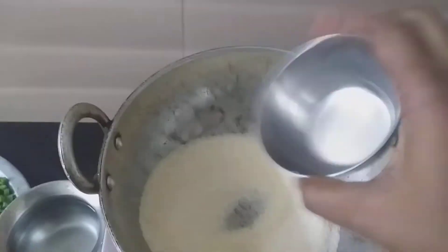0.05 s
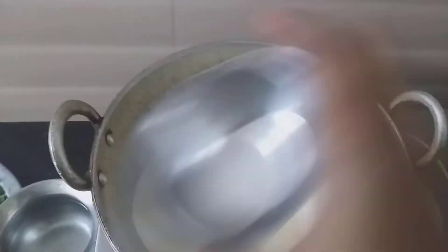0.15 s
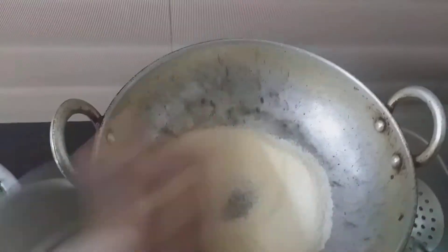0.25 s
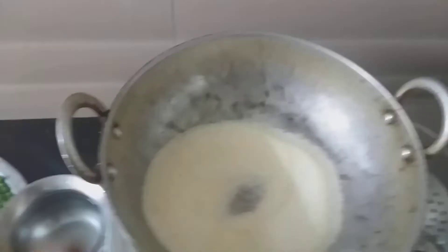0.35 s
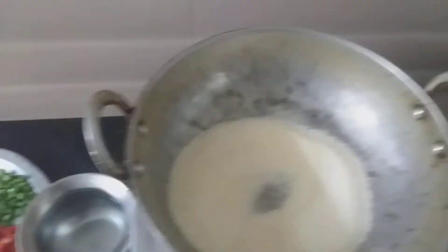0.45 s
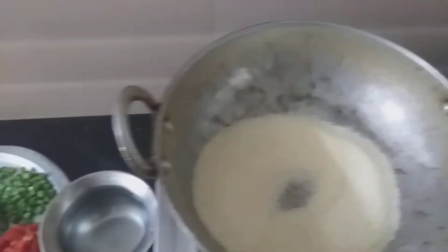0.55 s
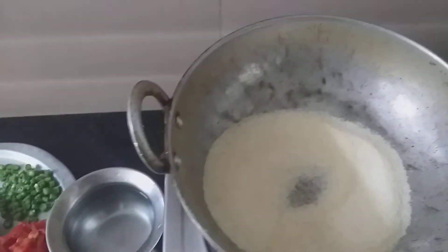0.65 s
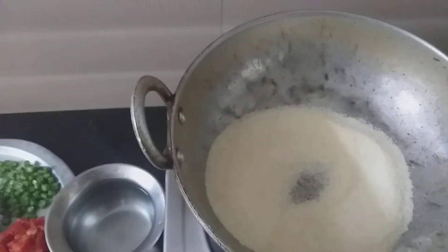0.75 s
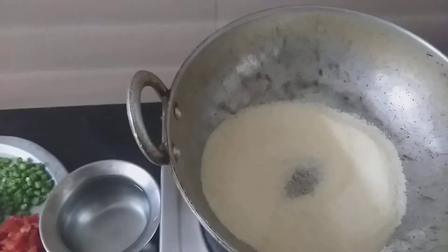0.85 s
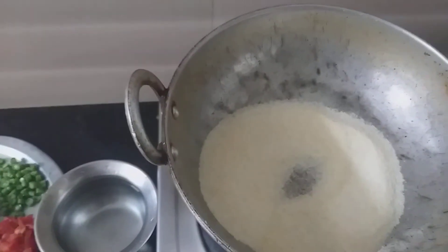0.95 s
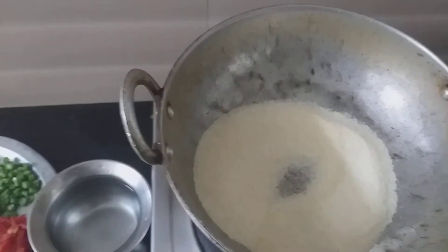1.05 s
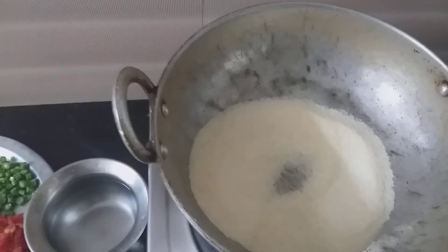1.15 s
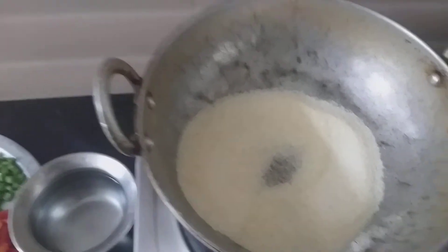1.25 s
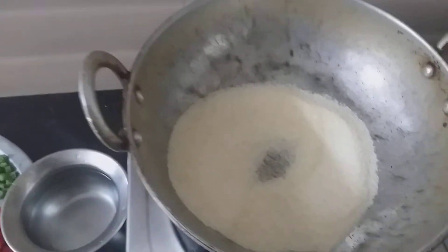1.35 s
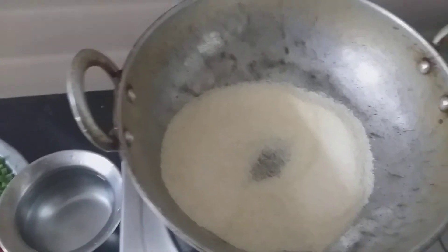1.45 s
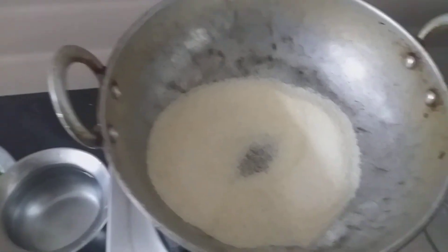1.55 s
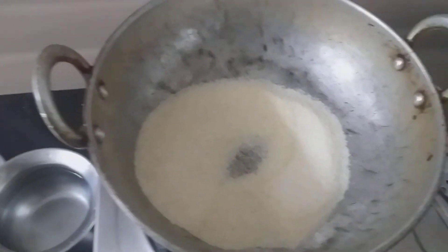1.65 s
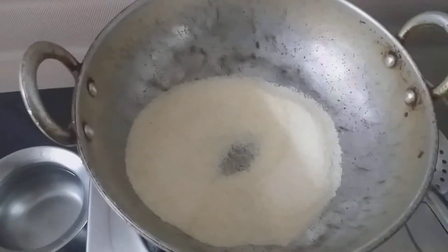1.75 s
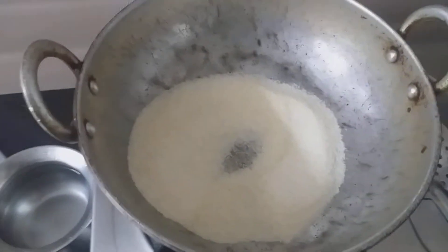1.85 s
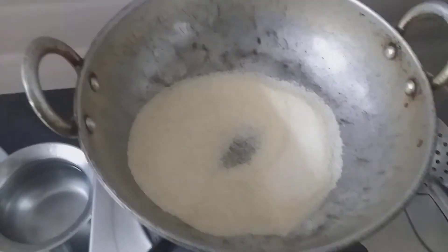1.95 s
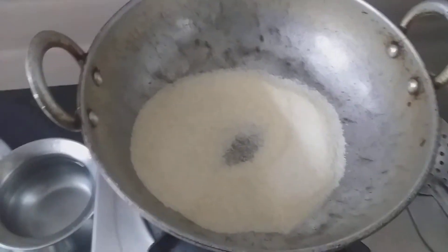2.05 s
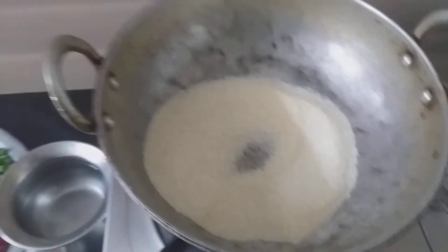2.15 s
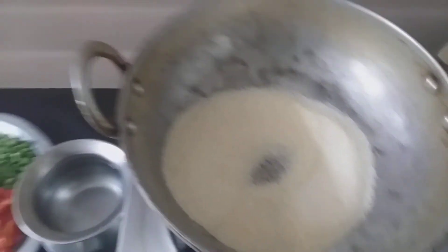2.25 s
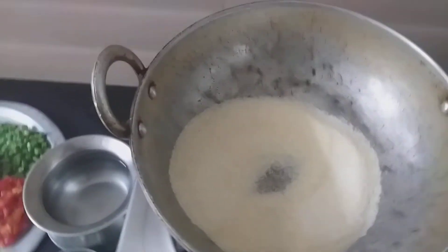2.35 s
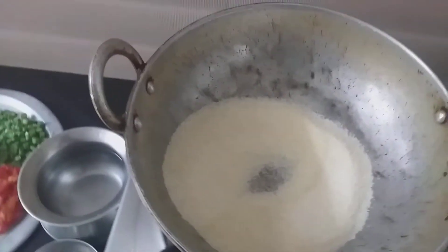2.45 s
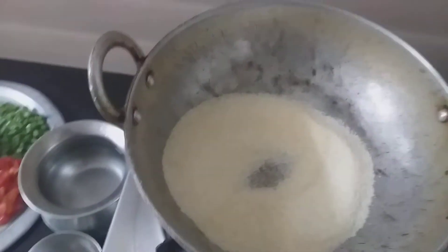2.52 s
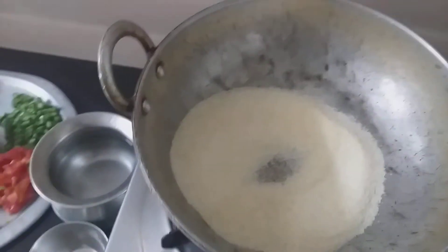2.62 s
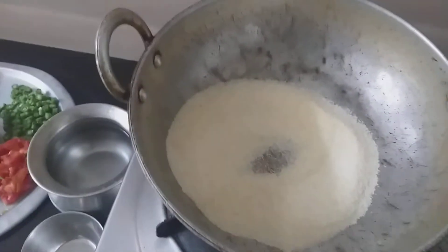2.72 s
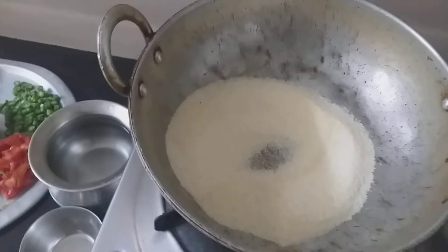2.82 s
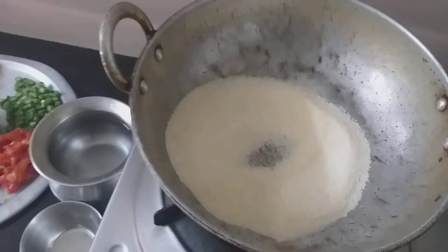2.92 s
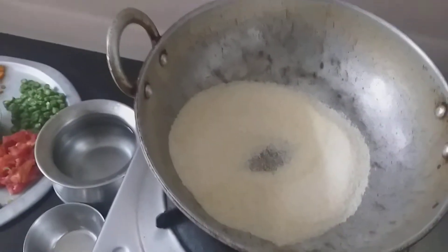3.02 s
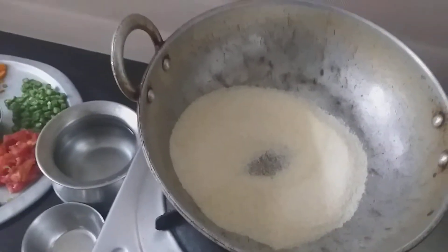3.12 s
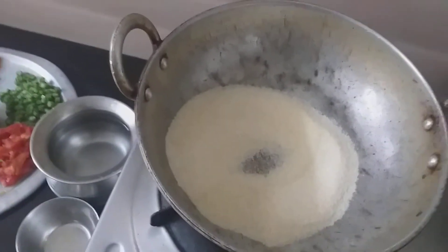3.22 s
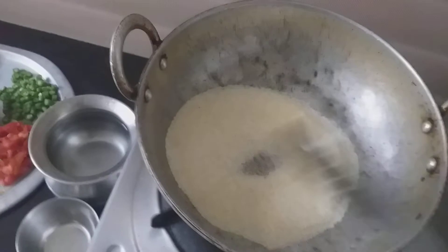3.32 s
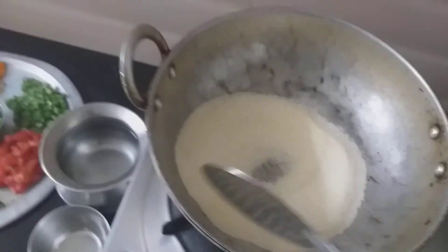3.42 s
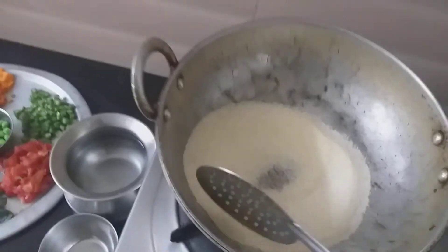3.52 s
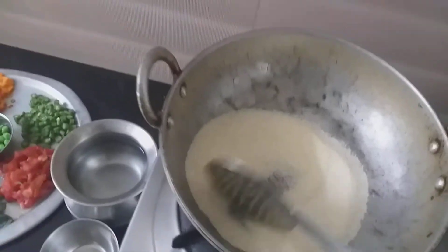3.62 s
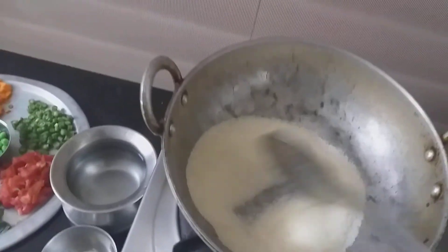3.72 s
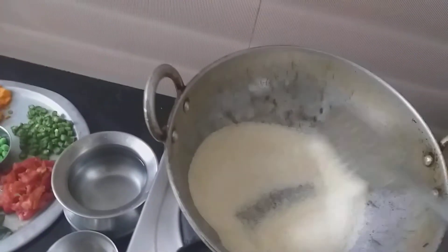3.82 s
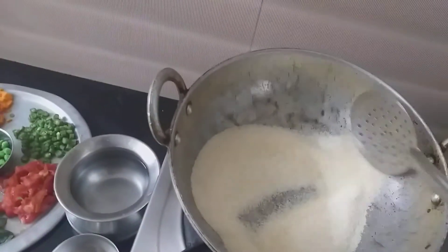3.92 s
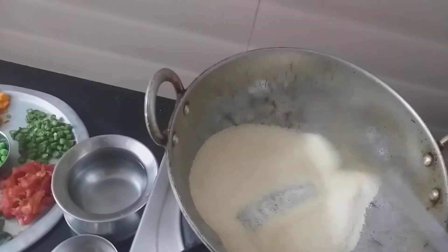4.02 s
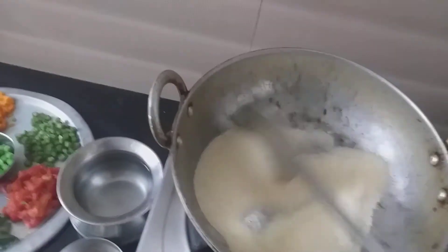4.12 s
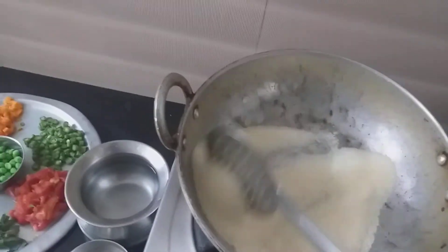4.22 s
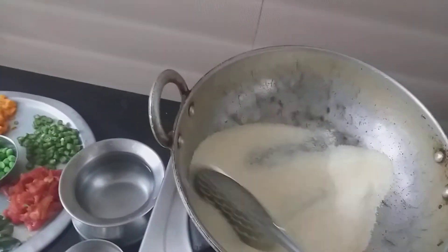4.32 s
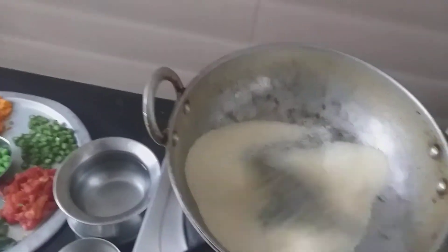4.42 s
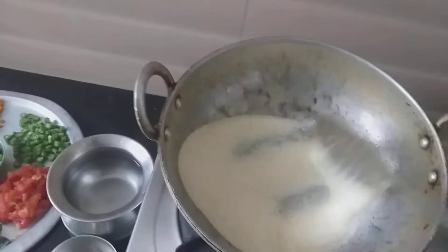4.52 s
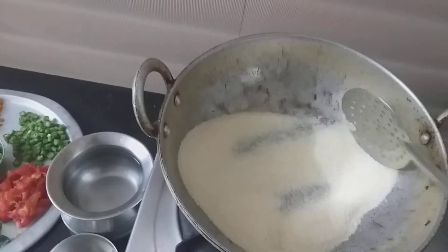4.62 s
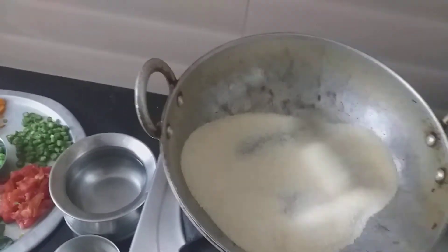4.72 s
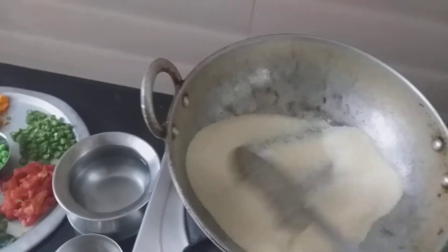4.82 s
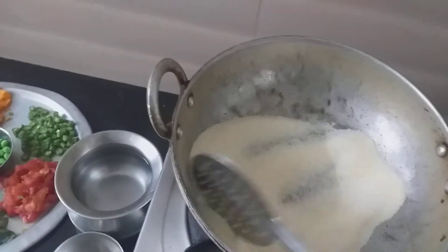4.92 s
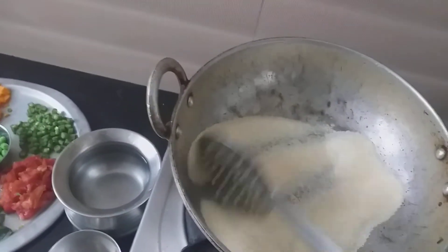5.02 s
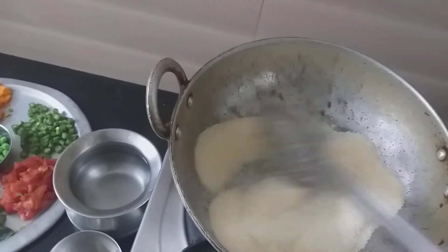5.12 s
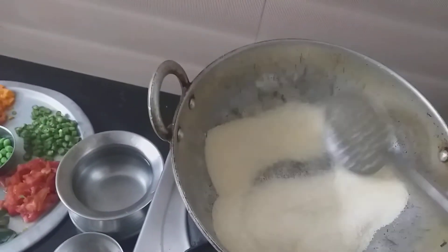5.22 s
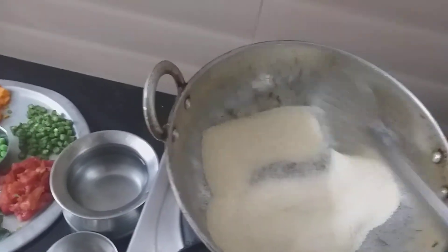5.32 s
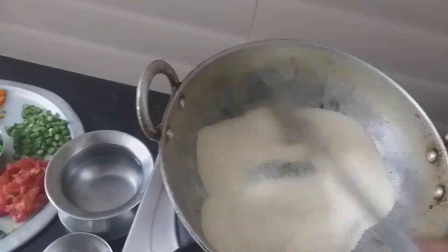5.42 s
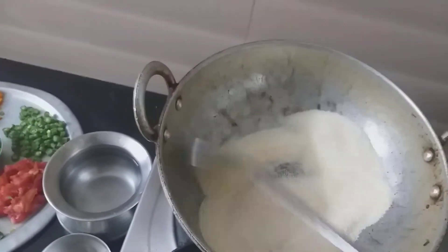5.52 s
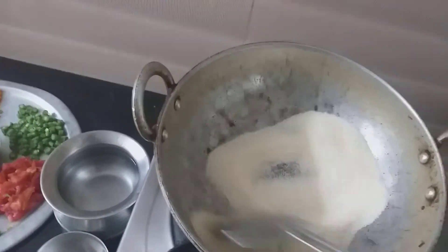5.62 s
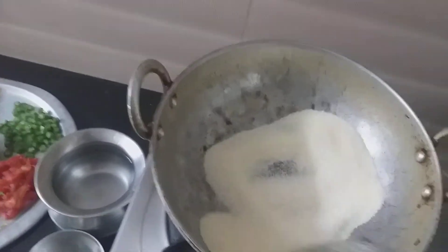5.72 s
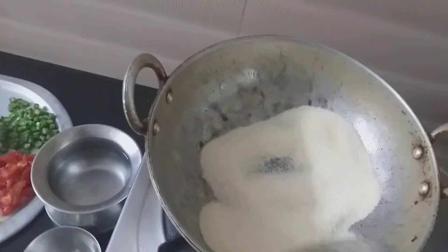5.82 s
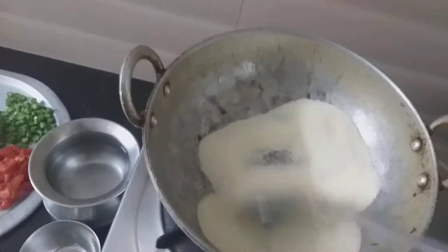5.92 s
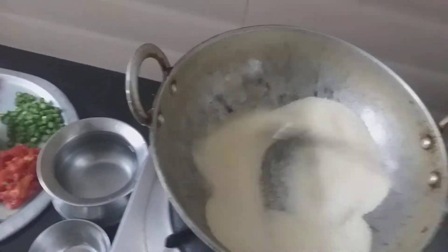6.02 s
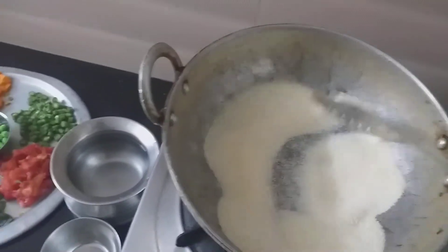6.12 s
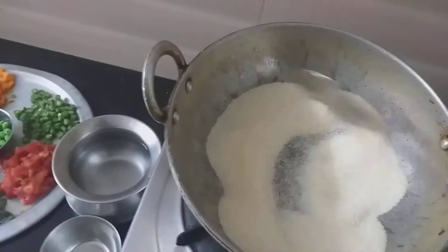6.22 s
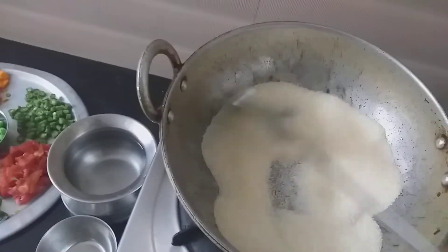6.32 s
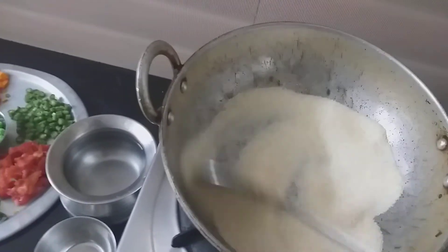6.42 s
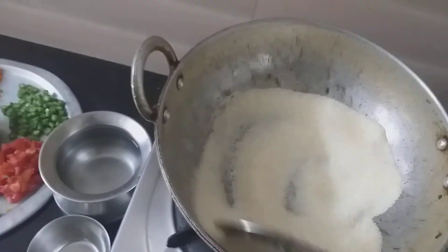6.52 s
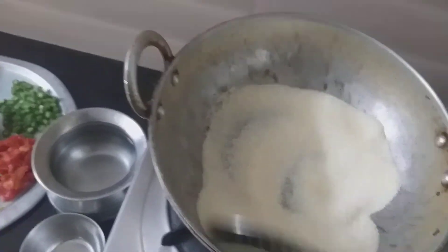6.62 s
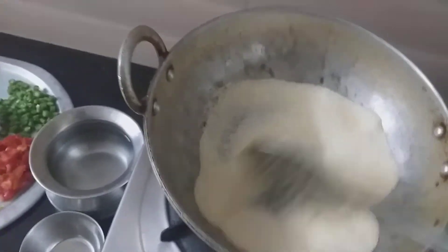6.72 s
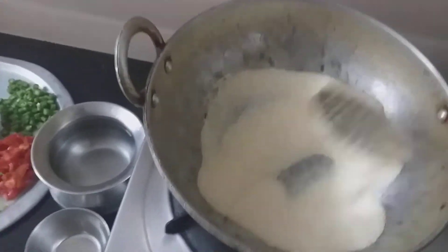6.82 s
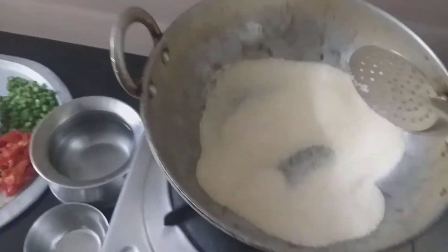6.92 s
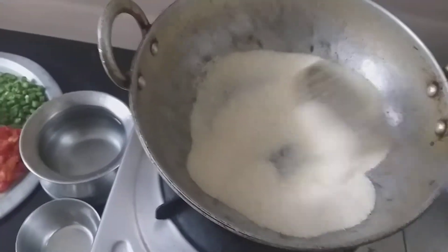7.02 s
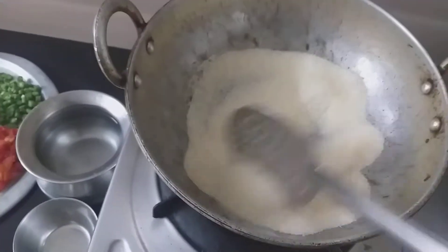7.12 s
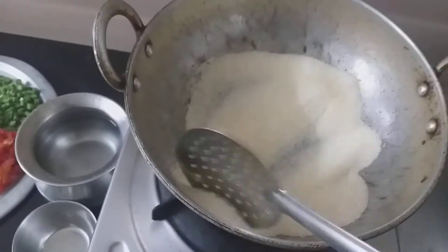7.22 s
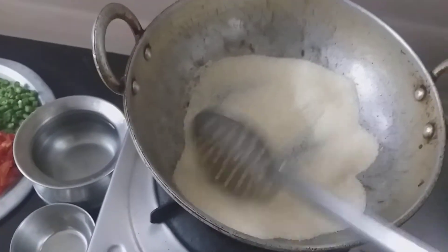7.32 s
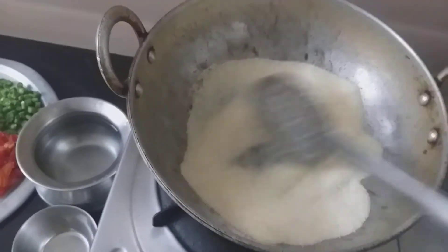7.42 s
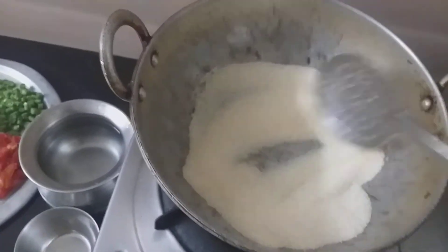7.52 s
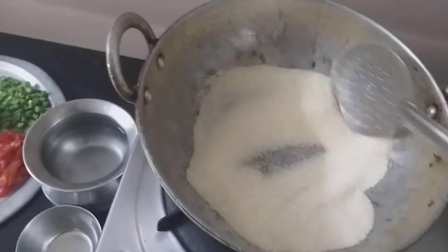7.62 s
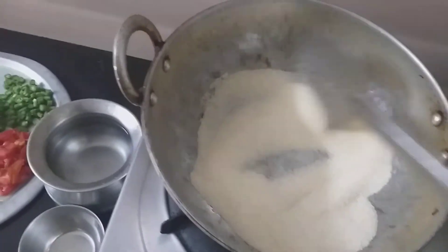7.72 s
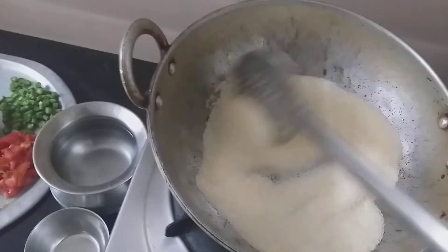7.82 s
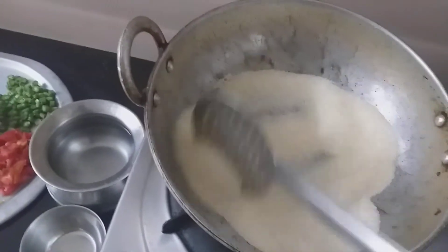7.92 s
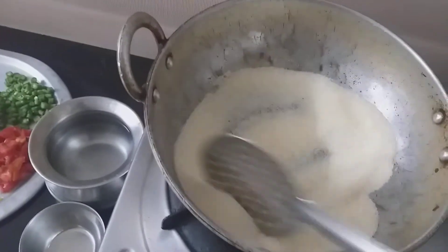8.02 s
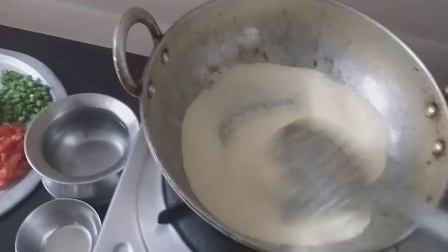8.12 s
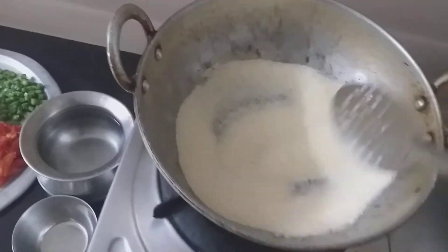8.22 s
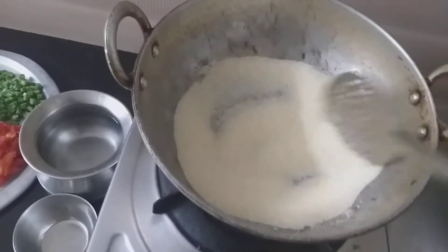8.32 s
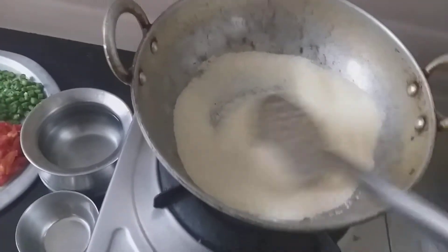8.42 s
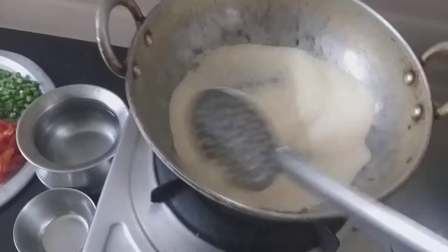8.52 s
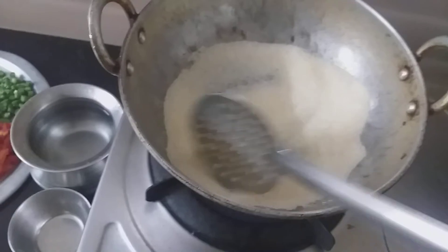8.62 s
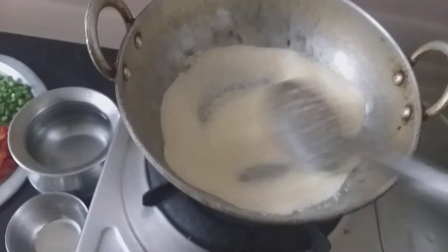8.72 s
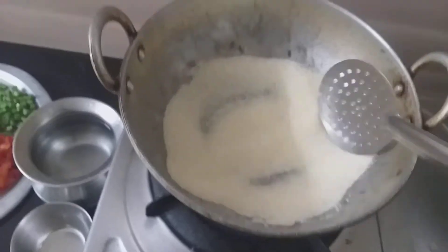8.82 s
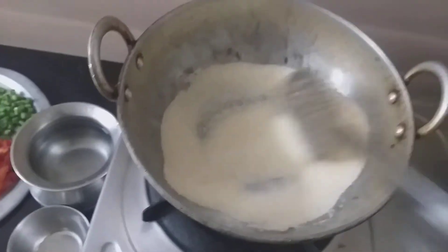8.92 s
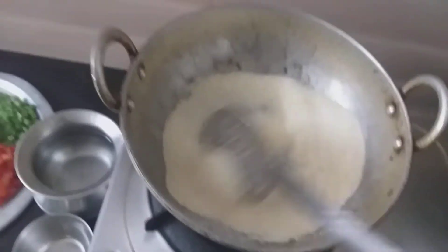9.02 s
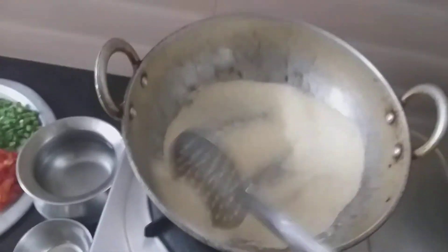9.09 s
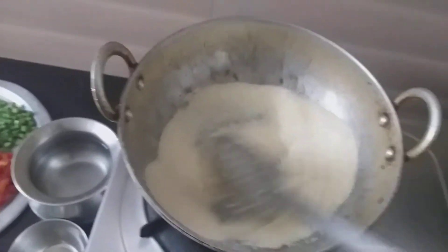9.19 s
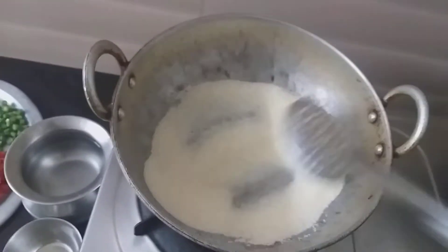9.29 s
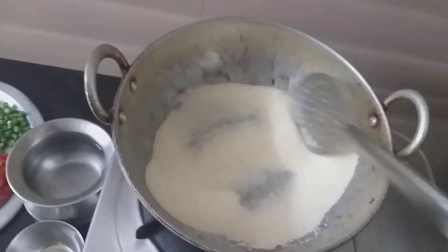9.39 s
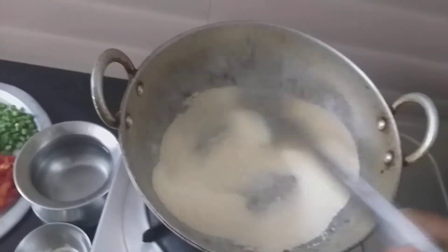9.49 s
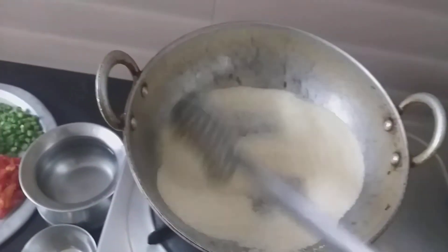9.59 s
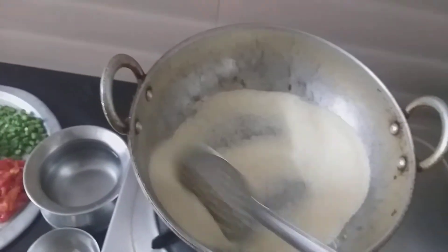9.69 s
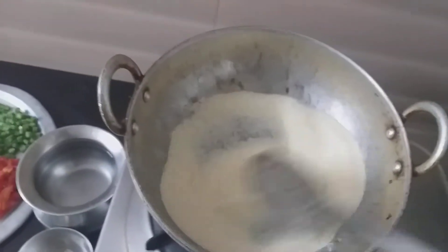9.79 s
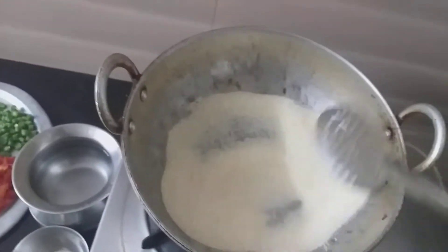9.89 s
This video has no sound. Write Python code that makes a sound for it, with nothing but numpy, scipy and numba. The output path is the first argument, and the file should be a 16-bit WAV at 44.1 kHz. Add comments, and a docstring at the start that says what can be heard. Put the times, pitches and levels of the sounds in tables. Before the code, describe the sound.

A steel cup clinks and is set down, then a metal spatula stirs dry semolina around a steel wok in quick, gritty strokes.

```python
"""Light utensil taps in a hushed small kitchen, then a steel cup clinks twice, skids and is set down on the counter.
Dry semolina is then stirred in a steel wok with a slotted metal spatula, stroke after stroke.
Cup, bowl and blade are ringing modes struck by noise bursts or impulses; grains are clumped random impacts.
Each stroke rumbles the bowl, grinds and cracks grain under the edge, and lets the heap slide back with a hiss."""
import sys
import numpy as np
from scipy import signal
from scipy.fft import rfft, irfft
from scipy.io import wavfile
from numba import njit

SR = 44100
rng = np.random.default_rng(int(sys.argv[2]) if len(sys.argv) > 2 else 0)


def store_wav(level_fs):
    """Save 16-bit WAV to argv[1]."""
    pcm = np.round(np.clip(np.atleast_2d(level_fs), -1, 1) * 32767)
    wavfile.write(sys.argv[1], SR, pcm.T.astype(np.int16))


N = 438794
TIME = np.arange(N) / SR

# Table levels are relative drives, ahead of each source's own trim and filter.
# Room hush spectrum: hz, level_db (per Hz)
HUSH_SPECTRUM = [(15, -69), (25, -28), (70, -19), (92, -2.5), (217, -14.5), (270, -12), (309, -11),
                 (607, -10.5), (734, -10.5), (796, -8.5), (1070, -13.5), (1890, -15.5), (2760, -30.5),
                 (3340, -28), (6000, -34.5), (8100, -29.5), (9800, -37.5), (11600, -30.5), (16000, -43)]
HUSH_DB = -58
LOW_HUM_HZ, LOW_HUM_DB = 95, -74.5
# Kitchen reverberation: hz, t60_s
KITCHEN_DECAY = [(200, 0.43), (1400, 0.61), (4000, 0.28), (9000, 0.66), (16000, 0.31)]

# Light taps of utensils being handled: start_s, tick_db, ring_db, thump_db
UTENSIL_TAPS = [(0.175, -45.5, -39.5, -84), (1.233, -34.5, -41, -48), (1.328, -34.5, -40, -49.5),
                (1.439, -42.5, -66, -54.5), (1.537, -49, -64, -77), (1.782, -51, -56, -82),
                (1.819, -46, -43, -54), (2.136, -51.5, -37, -60), (2.408, -59, -48, -77),
                (3.012, -64, -41.5, -82)]
# Resonances of the tapped steel: hz, width_hz, level_db
UTENSIL_MODES = [(7540, 110, -14), (8230, 130, 5.5), (11550, 91, 5), (12500, 140, 4), (14500, 230, -4)]

# The steel cup strikes and rebounds: start_s, level_db
CUP_CLINKS = [(1.6199, -20.5), (1.6444, -27.5)]
# Steel cup modes, some in close beating pairs: hz, level_db, t60_s
CUP_MODES = [(1480, -11, 0.19), (1555, -30, .2), (1592, -16, .22), (1635, -18, 0.15), (1786, -17, 0.2),
             (1850, 1, 0.26), (1917, -19, .22), (1978, 4, 0.12), (3798, -9.5, 0.64), (3722, -10, 0.78),
             (6115, -3.5, .42), (6140, -11, .42), (7070, -12, .26), (9005, -2, 0.15), (10350, -9.5, .2),
             (12450, -15, 0.2), (13420, -19, .26), (14240, -15, 0.18), (15060, -25, .27)]
# Clang under the cup's ring: hz, level_db (per Hz)
CLANG_SPECTRUM = [(60, -35), (250, -23.5), (600, -19.5), (1000, -8.5), (1300, -9), (1580, 5), (1950, -2),
                  (2300, -13), (5000, -27), (16000, -29)]
# The cup is set down on the counter: start_s, thud_db, scuff_db, thud_decay_s
CUP_KNOCKS = [(2.618, -38, -41.5, 0.036), (2.645, -35, -63, 0.041), (2.672, -32.5, -59, .028),
              (2.728, -29.5, -40.5, .025)]
# Level course of the cup's foot skidding: time_s, level_db
CUP_SKID = [(2.565, -82), (2.585, -48.5), (2.603, -46.5), (2.62, -40), (2.64, -80)]
# Dull thud of the counter: hz, level_db (per Hz)
THUD_SPECTRUM = [(70, -24), (160, -6.5), (300, -3), (580, -0.5), (850, -7), (1600, -17.5), (2500, -15.5),
                 (8000, -35)]
# Scuff of the cup on the counter: hz, level_db (per Hz)
SCUFF_SPECTRUM = [(500, -6), (2500, 0.5), (5500, -4.5), (8000, 1.5), (10000, -12), (13000, -10),
                  (16000, -20)]

# Strokes land in the middle of the pan, plough to the wall, climb it and lift off; the heap then settles:
# start_s, time_to_wall_s, time_to_lift_s, settling_t60_s, landing_click_db, blade_ring_db,
# bowl_hum_db, edge_judder_db, grinding_db, sliding_db, wall_pitch_hz
STIR_STROKES = [ (3.578, 0.092, 0.12, 1.14, -19, -70, -31, -43, -34.5, -39.5, 3380),
                (3.917, 0.11, 0.14, 1.3, -17.5, -39, -40.5, -36.5, -26.5, -36, 3740),
                (4.302, .12, 0.11, 0.62, -25, -45, -41.5, -44, -30.5, -33.5, 3030),
                (4.633, 0.03, 0.089, 0.76, -23, -42.5, -39, -43, -36.5, -38, 3900),
                (4.947, .13, 0.28, 0.27, -14.5, -34.5, -43, -32.5, -32, -35, 4320),
                (5.296, 0.0073, 0.21, 0.56, -20, -34.5, -37, -34, -36, -42, 5640),
                (5.461, 0.067, 0.099, 1.5, -38, -50, -41.5, -33.5, -35, -35.5, 5500),
                (5.777, 0.14, 0.24, .8, -12, -30.5, -43, -46, -30.5, -43, 3830),
                (6.174, 0.087, .16, 2.1, -42, -48, -42, -42, -29, -39.5, 4740),
                (6.593, 0.11, 0.12, 0.28, -39, -31, -38, -43.5, -28, -37.5, 3930),
                (6.936, 0.066, 0.076, 1.04, -13, -35, -32, -47.5, -31, -37.5, 4070),
                (7.213, 0.16, 0.18, 1.2, -34, -62, -35, -44, -34.5, -38, 4060),
                (7.602, .11, .19, 1.1, -30, -55, -42.5, -45.5, -29.5, -40, 4380),
                (7.896, 0.058, 0.083, 0.52, -24.5, -79, -43, -47, -44, -36.5, 5300),
                (8.061, 0.014, 0.052, 1.55, -14.5, -51, -44, -49.5, -44, -41, 5030),
                (8.29, 0.047, 0.056, 0.44, -26, -50, -47, -45.5, -39, -42, 3570),
                (8.566, 0.033, .12, 2.1, -20.5, -36.5, -26.5, -40, -42, -40.5, 4080),
                (8.817, 0.035, 0.12, 1.6, -15.5, -21.5, -34, -38, -34, -50, 3600),
                (9.095, 0.12, 0.11, 3.4, -18, -38.5, -30.5, -51.5, -34, -43, 4300),
                (9.385, 0.017, 0.11, 0.82, -23.5, -44, -36, -33, -30, -45, 3800),
                (9.550, 0.023, 0.11, 0.69, -44, -49, -38.5, -49.5, -47, -39, 4900),
                (9.740, 0.027, 0.061, .8, -45, -77, -51, -63, -43.5, -45, 4740), ]
# The edge snags on bare steel in mid-stroke: start_s, click_db, bowl_db, blade_db
STEEL_SNAGS = [(3.9294, -24, -55, -53), (4.957, -22, -34.5, -26), (5.0054, -24, -29.5, -34),
               (5.5111, -22, -34, -32), (5.5348, -24, -36.5, -28), (6.2768, -18, -33, -56),
               (6.3123, -27, -26.5, -38), (6.3244, -20, -34.5, -51), (6.667, -32, -33.5, -50)]
# The coarsest grains crack under the edge: start_s, peak_db, pitch_hz
GRAIN_CRACKS = [(3.717, -18, 2720), (4.0085, -8, 6500), (4.0617, -7, 3900), (4.0799, -22, 3980),
                (4.0904, -16.5, 4430), (4.4282, -22, 2800), (4.4493, -20, 2620), (4.6956, -12.5, 4540),
                (4.7333, -13, 8100), (5.0739, -17, 3300), (5.151, -14.5, 6740), (5.1832, -14, 3380),
                (5.4146, -14, 6400), (5.8262, -7, 5000), (5.883, -14.5, 5170), (5.9175, -11, 2860),
                (6.0041, -8, 6800), (6.0612, -12, 4120), (6.027, -18, 3500), (6.116, -18.5, 8960),
                (6.2416, -16.5, 5700), (6.2794, -11, 6000), (6.3141, -5, 3770), (6.3254, -9, 4300),
                (6.967, -14, 5420), (6.986, -16, 5760), (7.384, -14.5, 5400), (7.409, -12, 5400),
                (7.5692, -31, 8600), (7.659, -23, 6560), (7.8325, -18.5, 3760), (7.867, -16.5, 4490),
                (7.9, -16, 4960), (8.3404, -16, 3500), (8.9095, -17, 3720), (9.397, -10, 4660),
                (9.4547, -10.5, 6250), (9.4893, -8, 4370), (9.697, -30, 7050)]
# Resonances of the whole bowl: hz, width_hz, level_db
BOWL_MODES = [(109, 7.8, -16), (175, 49, -7.5), (279, 7.5, 11.5), (301, 21, 3), (305, 7.9, -2.5),
              (342.4, 7.2, 3)]
# Resonances of the bowl's grain-damped wall: hz, width_hz, level_db
WALL_MODES = [(422, 91, -14), (412, 81, -8), (541, 130, -5), (635, 51, -0.5), (755, 51, 2), (860, 69, -3.5),
              (1040, 36, -23)]
# Resonances of the spatula blade: hz, width_hz, level_db
BLADE_MODES = [(1340, 50, 1), (1505, 65, 13.5), (1788, 59, 17), (1896, 34, 19), (1970, 40, -27)]
# Grain ground between blade and bowl: hz, level_db (per Hz)
GRIND_SPECTRUM = [(60, -48), (1000, -20), (2200, -3.5), (2800, 0), (4200, -1.5), (5400, -2), (6500, 2),
                  (8000, 4), (10000, 7), (16000, -31)]
# Hiss of the sliding heap: hz, level_db (per Hz)
SLIDE_SPECTRUM = [(40, -61), (500, -4), (2000, -21), (4000, -7.5), (6500, -6), (8500, 1.5), (10000, -11),
                  (12000, -0.5), (14000, -4), (16000, -11)]
# Crunchy click of metal on metal: hz, level_db (per Hz)
CLICK_SPECTRUM = [(25, -55), (100, -20), (600, -6), (2500, -14), (3500, -2), (5000, 1), (7500, 6.5),
                  (10000, -1.5), (12500, -1.5), (16000, -7)]
# Snap of a bursting grain: hz, level_db (per Hz)
CRACK_SPECTRUM = [(25, -67), (80, -13), (300, -10.5), (850, -7.5), (1600, -20), (2400, -9.5), (3300, 0.5),
                  (5200, -3.5), (6600, 1), (10000, -7), (12000, -5), (16000, -10.5)]

BITE_S = 0.004   # the edge bites into the grain this fast
# A short soft hiss swells just ahead of each stroke
LEAD_IN_S, LEAD_IN_DB = 0.014, 4.5
# Grinding starts high and soft on the flat, then grows lower and louder toward the wall, where the heap is tallest
FLAT_HZ, GRIND_SWELL_DB, SLIDE_SWELL_DB = 6400, 14.5, 7.5
PITCH_WANDER_OCTAVES, PITCH_WANDER_PER_S = 0.064, 25
PATCH_OCTAVES, PATCH_DB, PATCH_PER_S = 0.069, 4, 22
# A hard landing drives the bowl strongly, then hum and judder relax toward plain dragging
DRAG_HUM_DB, DRAG_JUDDER_DB, RELAX_S = -43.5, -44, 0.091
# Both fade once the edge is on the wall
HUM_FALL_DB_PER_S, JUDDER_FALL_DB_PER_S = 17, 56
# After lift-off the contact sounds die away
HUM_RELEASE_DB_PER_S, JUDDER_RELEASE_DB_PER_S, GRIND_RELEASE_DB_PER_S = 148, 103, 183

CUP_LEAN = 0.2   # share of the cup's low modes added left and taken from the right
# Bands that differ between left and right: low_hz, high_hz, share_added_left (and taken from the right)
STEREO_BANDS = [(1580, 1960, 0.23), (8100, 8600, -0.11)]
CUTOFF_HZ = 16000


def from_db(db):
    """Decibels to gain."""
    return 10 ** (np.asarray(db) / 20)


def rms_one(x):
    """Scale to unit power."""
    return x / np.sqrt(np.mean(x ** 2) + 1e-20)


def at_hz(points, hz):
    """Read a table on a log-frequency axis."""
    known, values = np.transpose(points)
    return np.interp(np.log(np.maximum(hz, 1)), np.log(known), values)


def band_pass(x, low_hz, high_hz, order=2):
    """Keep the part of a sound between two frequencies."""
    return signal.sosfilt(signal.butter(order, [low_hz, high_hz], "band", fs=SR, output="sos"), x)


def drift(rate):
    """Random wandering of spread 1, drawn through this many random points a second."""
    knots = rng.standard_normal(N // 16)
    return rms_one(np.interp(TIME * rate, np.arange(len(knots)), knots))


def through(x, response):
    """Pass a sound through an impulse response scaled to unit energy."""
    return signal.oaconvolve(x, response / np.linalg.norm(response))[:N]


def colour(spectrum, size=4096):
    """Causal (minimum-phase) impulse response with the given spectrum."""
    gain = from_db(at_hz(spectrum, np.fft.rfftfreq(size, 1 / SR)))
    cepstrum = irfft(np.log(gain))
    return irfft(np.exp(rfft(2 * cepstrum[:size // 2], size)))


def body(resonances, size=8192):
    """Impulse response of damped resonances in parallel, with nothing kept below the lowest resonance."""
    t = TIME[:size]
    modes = 0
    for hz, width, db in resonances:
        decay = np.exp(-np.pi * width * t)
        modes = modes + from_db(db) * width * decay * np.cos(2 * np.pi * hz * t)
    return band_pass(modes, 0.78 * resonances[0][0], min(2 * resonances[-1][0], CUTOFF_HZ))


@njit
def resonate(x, angle, radius):
    """A resonance of moving pitch that keeps the power of white noise."""
    y = np.zeros(len(x))
    gain = np.sqrt((1 - radius ** 2) / 2)
    for i in range(2, len(x)):
        ringing = 2 * radius * np.cos(angle[i]) * y[i - 1] - radius ** 2 * y[i - 2]
        y[i] = gain * (x[i] - x[i - 2]) + ringing
    return y


def sing(x, hz, width_hz):
    """Ring a sound at a steady or moving pitch."""
    return resonate(x, 2 * np.pi * hz / SR * np.ones(len(x)), np.exp(-np.pi * width_hz / SR))


def burst(decay_s, rise_s, size=8192):
    """The many tiny collisions of one contact, as noise that rises and dies away."""
    t = TIME[:size]
    return rng.standard_normal(size) * np.exp(-t / decay_s) * (1 - np.exp(-t / rise_s))


def add(track, s, sound):
    """Mix a sound into a track at a given time."""
    start = int(s * SR)
    track[start:start + len(sound)] += sound[:N - start]


def grains(per_s, spread_db, clump_db, clump_rate):
    """Random impacts of uneven size that come in clumps; rms 1."""
    sizes = from_db(spread_db * np.minimum(rng.exponential(1, N), 4)) * rng.choice([-1, 1], N)
    hits = rng.random(N) < per_s / SR
    clumps = from_db(clump_db * np.clip(drift(clump_rate), -2, 2))
    return rms_one(sizes * hits * clumps)


def room_hush():
    """Steady noise in the colour of the quiet room."""
    return from_db(HUSH_DB) * through(rng.standard_normal(N), colour(HUSH_SPECTRUM))


def low_hum():
    """A faint low tone whose strength wavers."""
    return from_db(LOW_HUM_DB) * np.sin(2 * np.pi * LOW_HUM_HZ * TIME) * (1 + 0.5 * drift(13))


def kitchen(count=7):
    """Impulse response of the tiled room: diffuse echoes that die band by band."""
    t = TIME[:SR]
    edges = np.geomspace(80, 18000, count + 1)
    tail = 0
    for low, high in zip(edges, edges[1:]):
        band = band_pass(rng.standard_normal(SR), low, high)
        tail = tail + band * from_db(-60 * t / at_hz(KITCHEN_DECAY, np.sqrt(low * high)))
    return tail * (1 - np.exp(-(t / 0.00067) ** 2))


def taps():
    """Small dry ticks of steel, each with a short ring; the heavier ones thump the counter."""
    ticks, rings, thumps = np.zeros((3, N))
    for s, tick_db, ring_db, thump_db in UTENSIL_TAPS:
        add(ticks, s, from_db(tick_db) * burst(decay_s=0.0089, rise_s=0.00091))
        add(rings, s, from_db(ring_db + 4) * burst(decay_s=0.0025, rise_s=0.00096))
        add(thumps, s, from_db(thump_db) * burst(decay_s=0.07, rise_s=0.003))
    tick = through(ticks, colour(CLICK_SPECTRUM))
    return tick + through(rings, body(UTENSIL_MODES)) + through(thumps, colour(THUD_SPECTRUM))


def cup():
    """A hard blow rings the cup's modes over a brief clang; the cup moves in the hand, so each mode flutters."""
    t = TIME[:SR]
    attack = 1 - np.exp(-t / 0.0012)
    ring, clang = np.zeros((2, N))
    for s, db in CUP_CLINKS:
        for hz, level_db, t60 in CUP_MODES:
            # a complex flutter moves both strength and phase
            flutter = 1 + 0.5 * (drift(61) + 1j * drift(64))[:SR]
            mode = np.real(flutter * np.exp(2j * np.pi * (hz * t + rng.random())))
            add(ring, s, from_db(db - 3.5 + level_db - 60 * t / t60) * mode * attack)
        add(clang, s, from_db(db + 1.5) * burst(decay_s=0.024, rise_s=0.00051))
    return ring + through(clang, colour(CLANG_SPECTRUM))


def set_down():
    """The cup skids, then rocks onto the counter in a few dull knocks."""
    thud, scuff = np.zeros((2, N))
    for s, thud_db, scuff_db, decay_s in CUP_KNOCKS:
        add(thud, s, from_db(thud_db) * burst(decay_s, rise_s=0.0022))
        add(scuff, s, from_db(scuff_db) * burst(decay_s * 0.83, rise_s=0.00036))
    skid_db = np.interp(TIME, *np.transpose(CUP_SKID), left=-140, right=-140)
    skid = sing(from_db(skid_db) * rng.standard_normal(N), 4840, width_hz=1400)
    return through(thud, colour(THUD_SPECTRUM)) + through(scuff, colour(SCUFF_SPECTRUM)) + skid


def landings():
    """Metal meets metal through a skin of grain at landings and snags: crunchy click, bowl thump, blade ring."""
    click, bowl, blade = np.zeros((3, N))
    touchdowns = [(s, click_db, hum_db - 6.0, blade_db)
                  for s, _, _, _, click_db, blade_db, hum_db, *_ in STIR_STROKES]
    for s, click_db, bowl_db, blade_db in touchdowns + list(STEEL_SNAGS):
        add(click, s - 0.0008, from_db(click_db + 2.0) * burst(decay_s=0.0028, rise_s=0.0028))
        # single-sample blows strike the click, bowl and blade filters
        add(click, s + 0.0005, from_db([click_db + 12.5]))
        add(bowl, s, from_db([bowl_db + 24.5]))
        add(blade, s, from_db([blade_db + 18.5]))
    thump = through(bowl, body(WALL_MODES)) + from_db(-4) * through(bowl, body(BOWL_MODES))
    return through(click, colour(CLICK_SPECTRUM)) + thump + through(blade, body(BLADE_MODES))


def cracks():
    """A coarse grain jams under the edge, crunches for an instant and bursts with one sharp snap."""
    out, snaps = np.zeros((2, N))
    for s, db, hz in GRAIN_CRACKS:
        # the crunch is a reversed burst, so it builds up to the break
        crunch = from_db(-12) * burst(decay_s=0.0016, rise_s=0.00032, size=1024)[::-1]
        shards = np.concatenate([crunch, burst(decay_s=0.0026, rise_s=0.001)])
        pitched = shards + 0.5 * sing(shards, hz, width_hz=410)
        add(out, s - 0.0006 - len(crunch) / SR, from_db(db - 8.5) * pitched)
        add(snaps, s + 0.00037, from_db([db + 4]))
    return through(out + snaps, colour(CRACK_SPECTRUM))


def relaxed(db, drag_db, t):
    """Level that starts at db and sinks toward that of plain dragging."""
    return db - max(db - drag_db, 0) * (1 - np.exp(-t / RELAX_S))


def strokes():
    """Strength of hum, judder, grinding and sliding, and the grinding pitch; all strokes follow one course."""
    t = TIME[:SR]
    hum, judder, grind, slide = np.zeros((4, N))
    pitch = np.ones(N) * FLAT_HZ
    bite = 1 - np.exp(-t / BITE_S)
    lead_in = np.interp(t, [0, LEAD_IN_S, LEAD_IN_S + BITE_S], [0, 1, 0])
    for s, wall_s, lift_s, settle_s, _, _, hum_db, judder_db, grind_db, slide_db, wall_hz in STIR_STROKES:
        way = np.minimum(t / wall_s, 1)   # 0 at the middle, 1 at the wall
        on_wall, lifted = np.maximum(t - wall_s, 0), np.maximum(t - lift_s, 0)   # seconds since each
        hum_loss_db = HUM_FALL_DB_PER_S * on_wall + HUM_RELEASE_DB_PER_S * lifted
        judder_loss_db = JUDDER_FALL_DB_PER_S * on_wall + JUDDER_RELEASE_DB_PER_S * lifted
        grind_loss_db = GRIND_SWELL_DB * (1 - way ** 2) + GRIND_RELEASE_DB_PER_S * lifted
        settling = np.exp(-np.log(1000) * lifted / settle_s)
        add(hum, s, bite * from_db(relaxed(hum_db, DRAG_HUM_DB, t) - hum_loss_db))
        add(judder, s, bite * from_db(relaxed(judder_db, DRAG_JUDDER_DB, t) - judder_loss_db))
        add(grind, s, bite * from_db(grind_db - grind_loss_db))
        add(slide, s, bite * from_db(slide_db - SLIDE_SWELL_DB * (1.5 - way)) * settling)
        add(slide, s - LEAD_IN_S, lead_in * from_db(slide_db - SLIDE_SWELL_DB + LEAD_IN_DB))
        start = int(s * SR)
        pitch[start:start + SR] = (FLAT_HZ * (wall_hz / FLAT_HZ) ** (way ** 2))[:N - start]
    wander = 2 ** (PITCH_WANDER_OCTAVES * drift(PITCH_WANDER_PER_S))
    return hum, judder, grind, slide, pitch * wander


def grinding(level, pitch, count=8):
    """Clusters of grit ring patches of the blade; those near the pitch of the blade-to-bowl gap sound loudest."""
    patches = 0
    for hz in np.geomspace(2800, 8500, count):
        near = from_db(10.7 * np.exp(-(np.log(hz / pitch) / 0.37) ** 2))
        grit = grains(per_s=1400, spread_db=5.0, clump_db=5.5, clump_rate=54)
        # each patch wavers in pitch and strength as the edge rocks
        waver = 2 ** (PATCH_OCTAVES * drift(PATCH_PER_S))
        strength = from_db(PATCH_DB * drift(PATCH_PER_S))
        patches = patches + sing(level * near * grit * strength, hz * waver, width_hz=0.075 * hz)
    slips = rms_one(from_db(2.3 * np.clip(drift(260), -2, 2)))
    # the gap itself rasps in a narrow band that falls on the way to the wall
    rasp = sing(level * grains(per_s=900, spread_db=0.0, clump_db=6.5, clump_rate=94), pitch, width_hz=530)
    # lone hard grains tick out of the mass
    lone = level * grains(per_s=58, spread_db=1.0, clump_db=3.5, clump_rate=6.1)
    specks = through(lone, burst(decay_s=0.00029, rise_s=0.0001))
    # small lumps are crushed
    crushed = level * grains(per_s=60, spread_db=3.0, clump_db=2.5, clump_rate=8)
    lumps = through(crushed, burst(decay_s=0.0008, rise_s=0.00041))
    crunch = through(from_db(-9.0) * specks + lumps, colour(CRACK_SPECTRUM))
    return through(patches * slips / np.sqrt(count) + from_db(-5.5) * rasp, colour(GRIND_SPECTRUM)) + crunch


def stirring():
    """The edge judders over the steel, grinds grains against it and sets the heap sliding."""
    hum, judder, grind, slide, pitch = strokes()
    rumble = hum * grains(per_s=2500, spread_db=3.5, clump_db=-0.64, clump_rate=62)
    bowl = through(rumble, body(BOWL_MODES))
    slips = judder * grains(per_s=1800, spread_db=4.5, clump_db=1.5, clump_rate=83)
    # the blade chatters more the harder it is pressed, up to a limit
    pressure = np.minimum(judder / from_db(-27.0), 1)
    wall = through(slips, body(WALL_MODES))
    blade = through(slips * pressure, body(BLADE_MODES))
    steel = from_db(-3.5) * wall + from_db(-4.5) * blade
    heap = slide * grains(per_s=9000, spread_db=-1.0, clump_db=3.0, clump_rate=330)
    sliding = through(heap, colour(SLIDE_SPECTRUM))
    return from_db(-3.5) * bowl + steel + from_db(-14.0) * grinding(grind, pitch) + from_db(-3.5) * sliding


def scene(count=4):
    """The pan is close and fairly dry; the cup rings farther into the room, its low modes toward the left."""
    stir, clink, knock, ticks = stirring(), cup(), set_down(), taps()
    send = from_db(-10.0) * stir + from_db(-3) * clink + from_db(-4.5) * knock + from_db(-2.5) * ticks
    # a contact radiates differently toward each wall, so its echoes blend into an even hiss
    echoes = sum(through(landings() + cracks(), kitchen()) for wall in range(count)) / np.sqrt(count)
    room = through(send, kitchen()) + from_db(-5.5) * echoes
    lean = CUP_LEAN * band_pass(clink, 1250, 2100, order=1)
    background = room_hush() + low_hum() + room
    return background + ticks + clink + knock + stir + landings() + cracks() + np.array([lean, -lean])


def record(dry):
    """Left and right are nearly alike, apart from a few bands; the top is cut steeply."""
    side = sum(share * band_pass(dry[0], low, high) for low, high, share in STEREO_BANDS)
    top_cut = signal.ellip(12, 0.1, 80, CUTOFF_HZ, fs=SR, output="sos")
    return signal.sosfilt(top_cut, dry + [side, -side])


dry = scene()
out = record(dry)
store_wav(out)
```